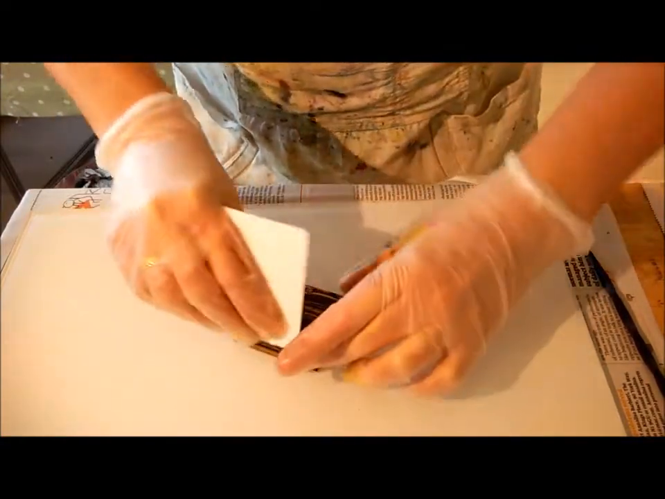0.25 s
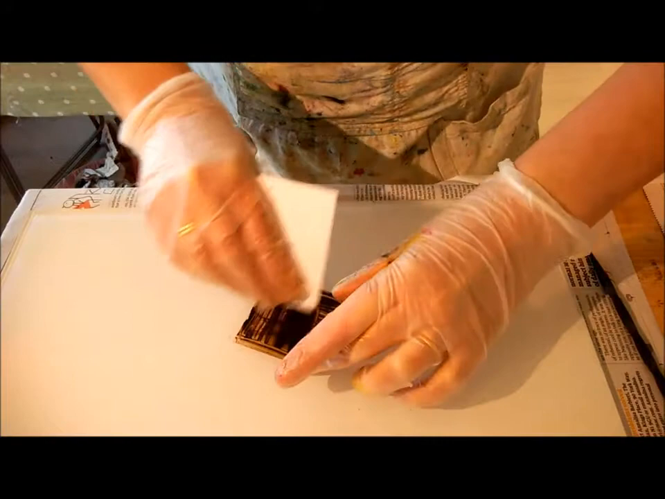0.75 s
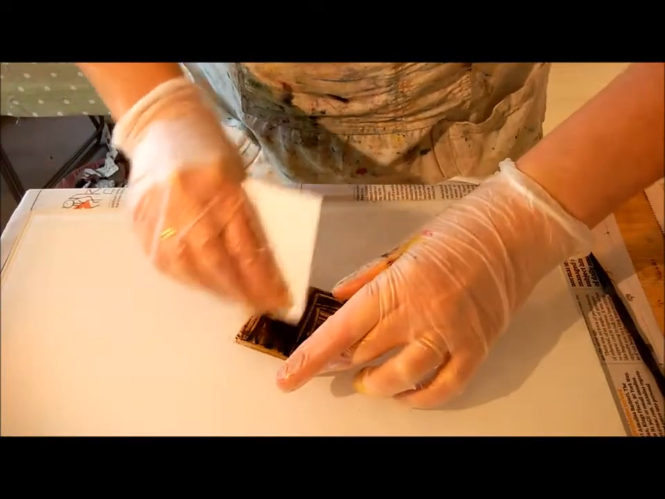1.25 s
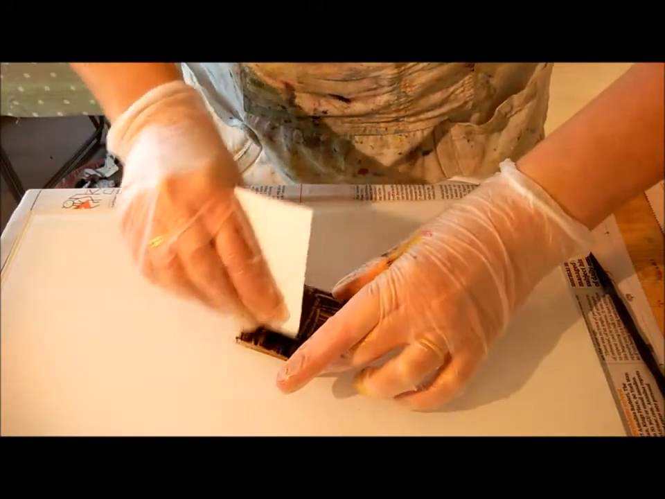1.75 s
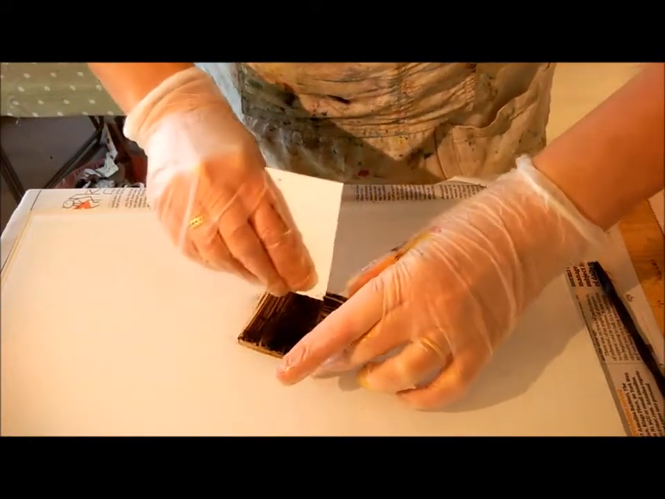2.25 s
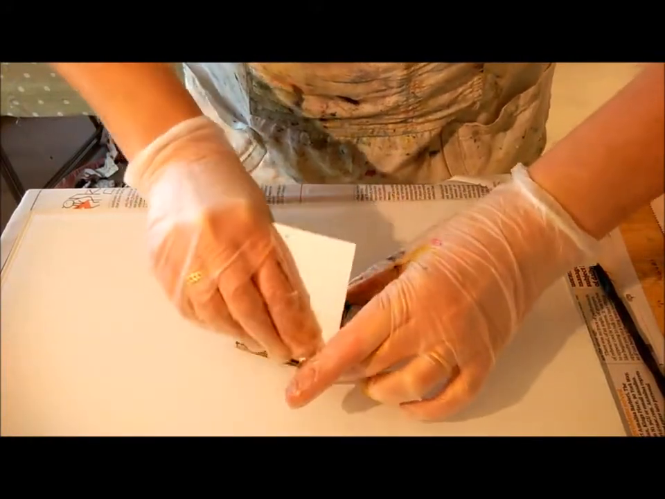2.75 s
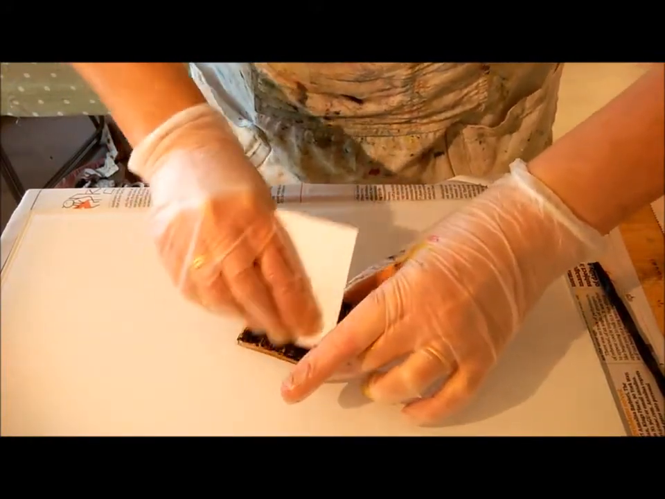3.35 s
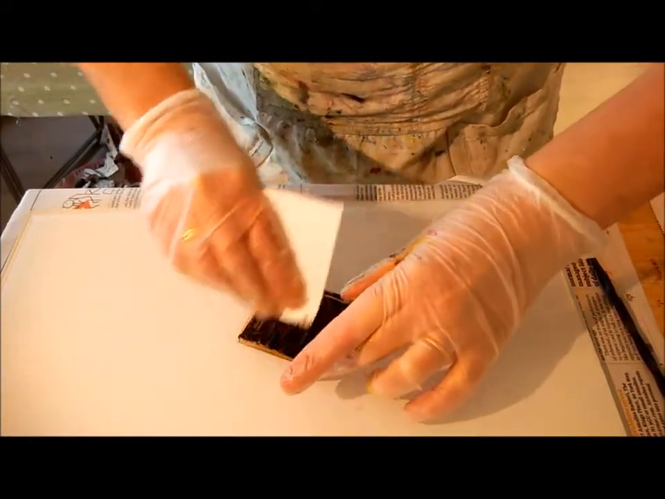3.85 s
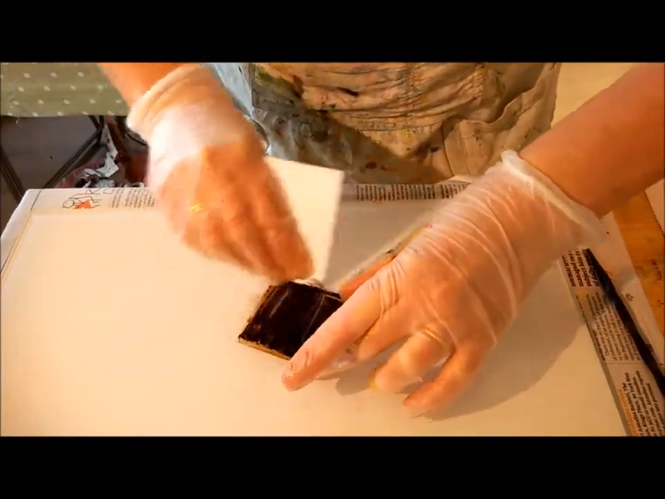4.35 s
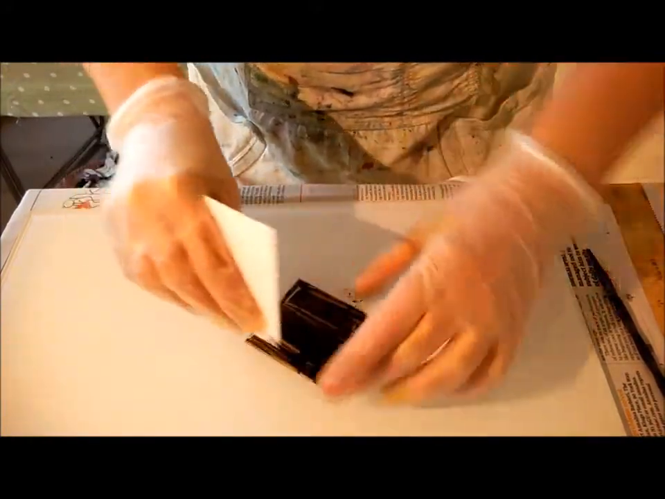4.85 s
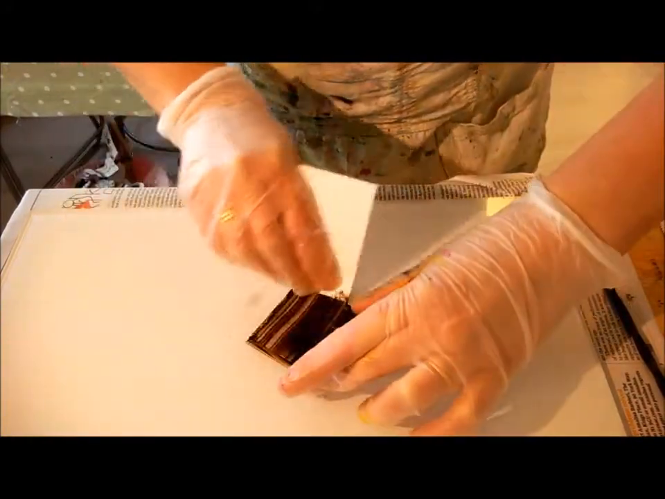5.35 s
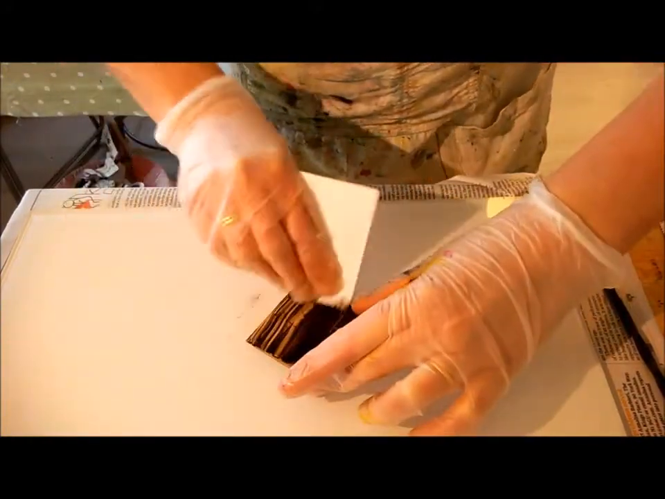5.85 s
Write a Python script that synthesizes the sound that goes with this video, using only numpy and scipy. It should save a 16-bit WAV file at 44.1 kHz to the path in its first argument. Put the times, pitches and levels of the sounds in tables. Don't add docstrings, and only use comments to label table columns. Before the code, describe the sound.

A quiet studio with steady soft air hiss, faint low hum and a very thin, high motor whine at the right. Thin plastic gloves crinkle at 0-0.15 s, then a card lands in a soft double knock near 0.35. Short gritty scrapes follow at about 0.64, 1.1, 1.6 and 2.1, each a stuttering rasp with small groove catches and ink hiss. Dry woody taps fall between them at 0.96, sharply at 1.29, then 1.43 and 1.9. After a lull and a tap at 2.73, scrapes return at 2.95, 3.46, 3.92 and 4.32, with knocks near 3.15, 3.28, 3.76 and 4.23. Gloves rustle again from 4.5 to 4.85. A soft press and tiny scrape come at 5.04, a slower rub at 5.3, a hard bright tap at 5.46, another at 5.64, then faint rubbing and ink ticks to the end. Close, dry stereo with a brief table tail.

```python
import sys
import numpy as np
from scipy import signal
from scipy.fft import rfft, irfft, next_fast_len
from scipy.io import wavfile
from scipy.ndimage import map_coordinates

SR = 44100
rng = np.random.default_rng(int(sys.argv[2]) if len(sys.argv) > 2 else 0)


def attenuation_scalar(level_db):
    decades = np.asarray(level_db, float) / 20
    return 10 ** decades


def master_out(mix):
    frames = np.transpose(np.atleast_2d(mix))
    ceiling = np.clip(frames, -1, 1)
    pcm = np.round(ceiling * 32767).astype(np.int16)
    wavfile.write(sys.argv[1], SR, pcm)


N = 269447

# [f/Hz, density level/dB]
AIR_SPECTRUM = [(30, -6), (42, -3.5), (200, -2.5), (400, -6.5), (1000, -15.5), (2300, -19.5), (4700, -20),
                (9000, -21.5), (13500, -22), (16500, -17.5)]
# [t/s, level/dB]
BUILDING_HUM = [(0.0, -62), (0.71, -66.5), (1.24, -63), (1.46, -57.5), (1.67, -64.5), (2.3, -63.5),
                (2.6, -65), (3.88, -59.5), (4.03, -69), (4.6, -61.5), (4.85, -68), (5.82, -65.5),
                (6.11, -76)]
# [f/Hz, width/Hz, level/dB]
HUM_MODES = [(45.8, 32, -34.5), (66.5, 8.1, 3.5), (123, 4.8, 1.5), (178.5, 16.6, 0.5)]
# [f/Hz, rms level/dB, buzz depth/1]
MOTOR_LINES = [(7621, -88, .2), (7981, -87, .8), (11400, -78, .95), (12000, -80, .9), (15181, -86, .1)]

# [t of top speed/s, rise/s, fall/s, rustle level/dB, rub over rustle/dB]
GRIP_SHIFTS = [
    (0.01, .05, 0.038, -61, -7),
    (0.08, 0.052, 0.055, -50, -16),
    (0.46, 0.04, 0.021, -60, -2),
    (2.26, 0.042, .09, -69, -2),
    (4.58, 0.11, 0.13, -58, -4),
    (4.68, 0.039, 0.056, -62.5, -2),
    (4.762, 0.0086, 0.0097, -61, 1),
    (4.815, .045, 0.047, -52.5, -33),
    (6.09, 0.033, 0.066, -69, -17),
]
# [f/Hz, density level/dB]
FILM_SPECTRUM = [(1500, -25), (3500, -9.5), (7000, -7.5), (9700, -0.5), (11500, -2.5), (15500, -15)]

# [t/s, peak level/dB, edge over peak/dB, crack over peak/dB, body centre f/Hz]
LANDINGS = [(0.325, -29, -19, -18, 426), (0.362, -25, -9, -10, 1010), (0.96, -23.5, -12.5, -12.5, 1060),
            (1.286, -15, -5, -4, 1250), (1.431, -22, -14, -18, 1100), (1.906, -19, -16.5, -16.5, 1090),
            (2.726, -24, -22, -24, 1000), (3.142, -25, -24, -35, 1270), (3.283, -23, -13.5, -24, 960),
            (3.635, -39, -26, -37, 600), (3.756, -17.5, -18.5, -33, 960), (4.23, -26, -12, -13, 1140),
            (5.461, -15, -2.5, -7, 1260), (5.639, -23.5, -16, -15, 1100)]
# [t/s, peak level/dB, crack over peak/dB, body centre f/Hz,
# contact/s]
SOFT_TOUCHES = [
    (0.327, -35, -28, 430, 0.017),
    (.500, -45.5, 5.5, 620, 0.0021),
    (1.280, -29.5, -22, 620, 0.00084),
    (1.296, -33, -10, 900, 0.00068),
    (5.031, -35, -21, 490, 0.0053),
    (5.455, -33, -12, 1330, 0.00093),
]
# [f/Hz, width/Hz, level/dB]
PLATE_MODES = [(268, 91, 3.5), (452, 122, 5.5), (620, 382, 1), (910, 150, -12.5), (1021, 101, -1.5),
               (1250, 165, 2), (1363, 207, -2), (1980, 77, -18)]
# [f/Hz, density level/dB]
CRACK_SPECTRUM = [(3000, -9.5), (5000, -6.5), (7000, -4.5), (10000, 0), (12500, -6.5), (16000, -15)]
# [f/Hz, decay by 60 dB t/s]
TABLE_DECAY = [(200, .25), (600, .24), (1200, .2), (2500, .13), (10000, .11)]
# [f/Hz, level/dB]
TABLE_GAIN = [(60, -25), (250, 0), (600, -4), (1200, -7), (2200, -16), (3500, -15), (10000, -16)]

# [t/s, crack level/dB]
INK_TICKS = [(0.448, -54), (0.795, -53), (0.825, -60), (1.246, -50), (1.704, -54), (2.889, -48.5),
             (3.58, -60), (4.035, -53), (4.412, -54), (5.004, -64), (5.42, -53.5), (5.822, -52),
             (5.83, -51), (5.849, -45), (5.958, -50.5), (6.079, -54.5), (6.097, -51)]
# [t/s, peak level/dB, edge over peak/dB, body centre f/Hz]
GROOVE_CATCHES = [(0.611, -24.5, -38, 1330), (0.638, -23, -37, 935), (0.647, -21.5, -38, 830),
                  (1.07, -32, -22, 665), (1.107, -29.5, -16, 1260), (1.121, -24.5, -11.5, 1230),
                  (1.132, -33, -6, 1350), (1.212, -29.5, -11.5, 1280), (1.545, -34, -26, 1050),
                  (1.583, -27.5, -17, 1240), (1.596, -38, 5, 1250), (1.605, -25.5, -8, 1300),
                  (2.058, -30.5, -10, 730), (2.077, -30, -2.5, 1295), (2.085, -31.5, -1.5, 670),
                  (2.963, -30, -6.5, 1260), (3.146, -29.5, -45, 1280), (3.437, -28.5, -19.5, 1410),
                  (3.469, -24.5, -8.5, 1140), (3.898, -30, -13, 1300), (3.914, -32, -13, 1250),
                  (3.925, -41, 9, 1250), (4.309, -31.5, -6.5, 1070), (4.321, -39, -2.5, 638),
                  (4.393, -31.5, -5.5, 1250), (5.404, -34.5, -24, 560), (5.791, -39, -16, 1250),
                  (5.928, -39, -30, 1210), (5.953, -46, -17, 1310)]
# [t/s, peak level/dB, edge over peak/dB, body centre f/Hz]
LIGHT_SKIPS = [(1.154, -44, -14, 627), (1.174, -57, 8, 1400), (1.183, -43, 3, 544),
               (1.665, -38, -1.5, 1280), (2.023, -39, -20, 734), (2.112, -58, -7, 1260),
               (2.141, -41.5, -7.5, 1310), (2.238, -49, -12, 530), (2.329, -45.5, -26, 630),
               (2.921, -41, -9, 600), (2.943, -32, -17, 1250), (3.074, -42.5, -31, 404),
               (3.95, -45, 4, 1270), (3.981, -40, -2, 1370), (4.01, -36.5, -22, 1360),
               (4.343, -56, -3, 1310), (4.364, -48.5, 2, 1370), (4.375, -50, 7.5, 1260),
               (5.314, -46, -19, 703), (5.36, -47, 6, 684), (5.88, -37, -19, 1210), (5.978, -37, -14, 1160)]
# [f/Hz, width/Hz, level/dB]
CARD_MODES = [(500, 254, 0), (600, 170, 5), (824, 260, 0.5), (1050, 640, -5.5), (1270, 215, 3),
              (2100, 17, -31)]
# [f/Hz, width/Hz, level/dB]
EDGE_MODES = [(2496, 267, 14.5), (3410, 830, 15), (1812, 120, 15)]

# [t of top speed/s, rise/s, fall/s, body level/dB, brightness level/dB]
QUICK_STROKES = [(0.64, 0.072, 0.077, -38, -8.5), (0.83, 0.02, 0.031, -56, -13),
                 (1.125, 0.061, 0.091, -41, -2.5), (1.601, 0.056, 0.072, -40.5, -1),
                 (2.083, 0.065, 0.074, -45.5, 2.5), (2.715, 0.042, 0.02, -61, 8.5),
                 (2.952, 0.065, 0.096, -39, -2), (3.458, 0.062, 0.11, -42, -1),
                 (3.918, 0.062, 0.097, -40, -1), (4.32, .05, 0.089, -46, -5),
                 (5.038, 0.028, 0.017, -50, -5)]
# [t of top speed/s, rise/s, fall/s, body level/dB, brightness level/dB]
SLOW_RUBS = [
    (5.32, 0.083, 0.097, -52, -0.5),
    (5.80, 0.055, 0.042, -62, -6.5),
    (5.92, 0.2, 0.11, -56, -3),
]
# [f/Hz, density level/dB]
INK_SPECTRUM = [(3500, -6.5), (5000, -2.5), (6000, -7), (8500, -2.5), (11000, -5), (13000, -15),
                (15500, -22)]

# [t/s, left level/dB, right level/dB]
REFLECTIONS = [(.0013, -79, -17.5), (.0029, -73, -26.5), (.0047, -78, -11)]
# [f/Hz, level/dB]
HAND_SHADOW = [(1000, 0.5), (3500, -6), (4500, 6.5), (10000, -5.5), (11500, -4), (15500, -7)]
# [f/Hz, level/dB]
LEFT_RESPONSE = [(50, 6), (250, 0), (700, -1.5), (3000, -0.5), (5000, -6.5), (10000, -4), (12000, -11.5),
                 (15500, -9.5)]
# [f/Hz, share subtracted/1]
CROSS_FEED = [(60, 0), (150, .12), (400, .45), (1200, .56), (2300, .58), (3500, .46), (4700, .4),
              (9000, .3), (11000, .1), (15000, .08)]

STEADY_TOP_HZ = 15520
FADE_DB = 19.5
DRAG_CURVE, SLIDE_CURVE = 0.88, 1.62


def unit(x):
    return x / np.sqrt(np.mean(x ** 2) + 1e-20)


def along(points, hz):
    f, v = np.transpose(points)
    return np.interp(np.log(hz + 1), np.log(f + 1), v)


def shaped(points):
    return lambda hz: attenuation_scalar(along(points, hz))


def resonant(modes):
    def response(f):
        total = 0
        for k, (centre, width, db) in enumerate(modes):
            damping = 1j * f * width
            total = total + (-1) ** k * attenuation_scalar(db) * damping / (centre * centre - f * f + damping)
        return total
    return response


def filtered(x, response):
    n = x.shape[-1]
    m = next_fast_len(n + 4096)
    spectrum = rfft(x, m) * response(np.fft.rfftfreq(m, 1 / SR))
    return irfft(spectrum, m)[..., :n]


def wobble(rate):
    knots = rng.standard_normal(int(N * rate / SR) + 4)
    return map_coordinates(knots, [np.arange(N) * rate / SR])


def studio():
    t = np.arange(N) / SR
    noise = lambda response: unit(filtered(rng.standard_normal((2, N)), response))
    air = attenuation_scalar(-55.5 + 0.7 * wobble(4.5)) * noise(shaped(AIR_SPECTRUM))
    hum_db = np.interp(t, *np.transpose(BUILDING_HUM)) + 3.5
    hum = attenuation_scalar(hum_db) * noise(resonant(HUM_MODES))
    near_db, flutter_db, drift_rad, buzz_hz = 8, 1.5, 0.4, 59.6
    buzz = np.sin(2 * np.pi * buzz_hz * t)
    whine = np.zeros(N)
    for hz, db, depth in MOTOR_LINES:
        level = attenuation_scalar(db + near_db + flutter_db * wobble(33))
        tone = np.sin(2 * np.pi * hz * t + drift_rad * wobble(24))
        whine += level * (1 + depth * buzz) * tone
    return air + hum + whine * [[.1], [1]]


def grit(rate, spread_db, smooth):
    happens = rng.random(N) < rate / SR
    slips = happens * rng.choice([-1, 1], N) * attenuation_scalar(spread_db * rng.exponential(size=N))
    return unit(unit(slips) + smooth * rng.standard_normal(N))


def moves(rows, curve):
    s, up, down, *cols = np.transpose(rows)[:, :, None]
    t = np.arange(0, N / SR + .001, .001) - s
    progress = np.abs(t / np.where(t < 0, up, down))
    return [-FADE_DB * progress ** curve] + cols


def summed(db):
    ms = np.arange(N) / SR * 1000
    return np.interp(ms, np.arange(db.shape[1]), attenuation_scalar(db).sum(0))


def gloves():
    speed_db, db, rub_db = moves(GRIP_SHIFTS, SLIDE_CURVE)
    film = [filtered(grit(6700, spread_db=2.5, smooth=3.0), shaped(FILM_SPECTRUM)) for _ in range(2)]
    rustle = unit(np.array([0.092 * film[0] + 0.83 * film[1], film[0]]))
    rub = unit(filtered(grit(2000, spread_db=-6.5, smooth=0.21), resonant(CARD_MODES)))
    both = summed(db + speed_db) * rustle + summed(db + speed_db + rub_db - 12.0) * rub
    return attenuation_scalar(7.0 + 1.3 * wobble(66)) * both


def contacts(rows, modes, rough, rise, late):
    out, t = np.zeros((2, N + SR)), np.arange(2048) / SR
    peak = lambda x: x / np.abs(x).max()
    for s, db, edge_db, crack_db, centre_hz, contact in rows:
        contact = np.clip(contact, .0002, .02)
        grain = rng.standard_normal((2, len(t)))
        swell = np.exp(-t / contact) * (1 - np.exp(-(t + 1e-5) / (rise * contact)))
        push = (rough * grain[0] - (t < .0003)) * swell
        near = []
        for hz, width, mode_db in modes:
            octaves = abs(np.log2(hz / centre_hz))
            near.append((hz, width, mode_db + rng.normal(0, 1.5) - 8 * octaves))
        body = peak(filtered(push, resonant(near)))
        edge = peak(filtered(push, resonant(EDGE_MODES)))
        spit = (0.44 * grain[1] + grain) * swell ** 0.72
        crack = peak(filtered(spit, shaped(CRACK_SPECTRUM)))
        hit = body + attenuation_scalar(edge_db + 9.0) * edge + attenuation_scalar(crack_db + 14.5) * crack
        out[:, round((s + late) * SR):][:, :len(t)] += attenuation_scalar(db - 2.5) * hit
    return out[:, :N]


def blows():
    soft = [(s, db, -27.5, crack, hz, long) for s, db, crack, hz, long in SOFT_TOUCHES]
    hard = []
    for s, db, edge, crack, hz in LANDINGS:
        contact_s = 0.0015 * np.exp(-0.13 * (db + 23))
        hard.append((s, db, edge, crack, hz, contact_s))
    touches = contacts(soft, PLATE_MODES, rough=1.3, rise=0.4, late=0)
    return touches + contacts(hard, PLATE_MODES, rough=0.87, rise=0.0071, late=.0008)


def table(x):
    out, step = np.zeros((2, N + SR)), SR // 4
    for a in range(0, N, step):
        hz, t, z = signal.stft(rng.standard_normal((2, SR // 3)), SR, nperseg=256)
        z[1] = 0.31 * z[0] + 0.43 * z[1]
        decay = attenuation_scalar(-60 * t / along(TABLE_DECAY, hz)[:, None])
        tail = signal.istft(z * decay, SR, nperseg=256)[1]
        tail = tail / np.linalg.norm(tail[0])
        wet = signal.fftconvolve(x[None, a:a + step], tail, axes=1)
        out[:, a + 150:a + 150 + wet.shape[1]] += wet
    return filtered(out[:, :N], shaped(TABLE_GAIN))


def snags():
    body_db, crack_under_edge_db = -8, 10
    rows = [(s, db + body_db, -6, -body_db, 600, 0.0021) for s, db in INK_TICKS]
    for kind, contact_s in ((GROOVE_CATCHES, 0.0026), (LIGHT_SKIPS, .002)):
        for s, db, edge, hz in kind:
            rows.append((s, db, edge, edge - crack_under_edge_db, hz, contact_s))
    return contacts(rows, CARD_MODES, rough=4.5, rise=2.5, late=-.0008)


def strokes():
    quick, slow = moves(QUICK_STROKES, DRAG_CURVE), moves(SLOW_RUBS, SLIDE_CURVE)
    speed_db, db, bright_db = map(np.vstack, zip(quick, slow))
    gain = lambda over_db: summed(db + speed_db + over_db)
    clumps = 1.8 * wobble(80) + 2.8 * wobble(250)
    slips = grit(1800, spread_db=2.8, smooth=.7)
    low = unit(attenuation_scalar(clumps) * filtered(slips, resonant(CARD_MODES[:3])))
    high = unit(attenuation_scalar(clumps) * filtered(slips, resonant(CARD_MODES[3:])))
    rasp = unit(attenuation_scalar(clumps + 0.17 * wobble(130)) * filtered(slips, resonant(EDGE_MODES)))
    ink = np.array([0.067 * slips + grit(5600, spread_db=-2, smooth=4.2) for _ in range(2)])
    hiss = unit(attenuation_scalar(0.76 * clumps) * filtered(ink, shaped(INK_SPECTRUM)))
    low_db = -0.59 * bright_db - 2
    rasp_db = 4 + 0.75 * bright_db + 0.23 * speed_db
    hiss_db = 5.5 + bright_db + 0.13 * speed_db
    body = gain(low_db) * low - gain(-2) * high
    return attenuation_scalar(-1.0) * (body + gain(rasp_db) * rasp + gain(hiss_db) * hiss)


def paths(x):
    delay = lambda f, seconds: np.exp(-2j * np.pi * f * seconds)
    echo = lambda f, side: sum(attenuation_scalar(row[side]) * delay(f, row[0]) for row in REFLECTIONS)
    thin = lambda f: (1j * f / (180 + 1j * f)) ** 2
    left = lambda f: thin(f) * shaped(HAND_SHADOW)(f) * delay(f, .00002) * (1 + echo(f, 1))
    right = lambda f: thin(f) * (1 + echo(f, 2))
    return np.array([filtered(x[0], left), filtered(x[1], right)])


def scene():
    background = studio() + gloves()
    taps = blows()
    drag = snags() + strokes()
    steady = paths(drag) + table(drag[1] + taps[1]) + background
    return paths(taps) + filtered(steady, lambda hz: hz < STEADY_TOP_HZ)


def band_limit(x):
    return signal.sosfilt(signal.butter(12, 16400, fs=SR, output="sos"), x)


def record(dry):
    mics = np.array([filtered(dry[0], shaped(LEFT_RESPONSE)), dry[1]])
    late = lambda hz: np.clip(along(CROSS_FEED, hz), 0, .9) * np.exp(-2j * np.pi * hz * 0.0004176)
    band_edge = lambda hz: np.clip((STEADY_TOP_HZ + 1100 - hz) / 900, 0, 1) ** 2
    wide = filtered(mics - filtered(mics[::-1], late), band_edge)
    return band_limit(wide)


dry = scene()
out = record(dry)
master_out(out)
```